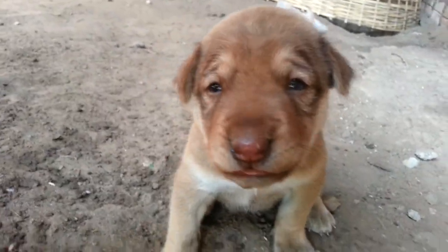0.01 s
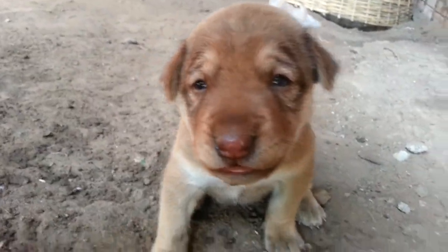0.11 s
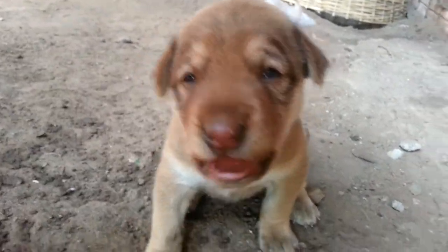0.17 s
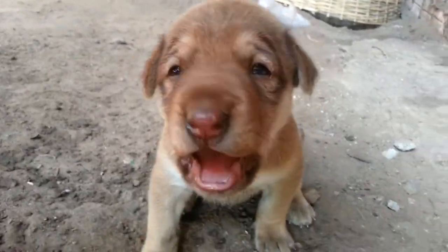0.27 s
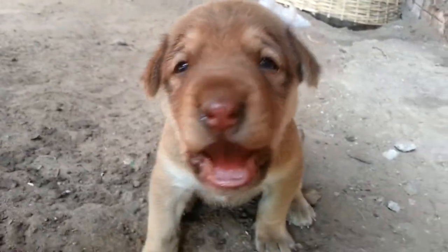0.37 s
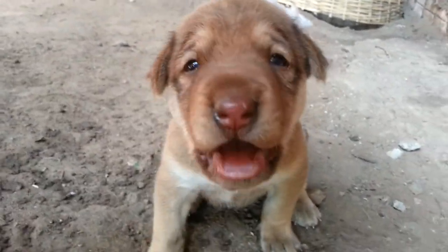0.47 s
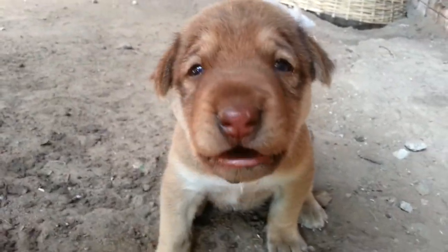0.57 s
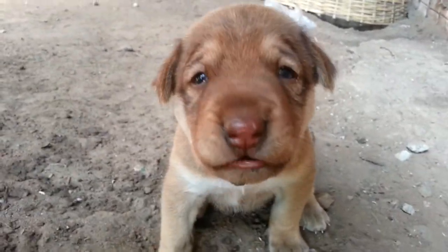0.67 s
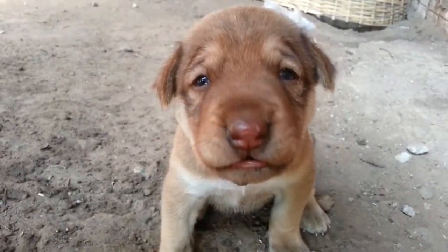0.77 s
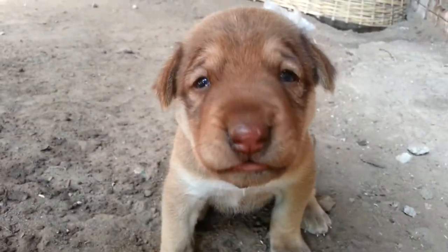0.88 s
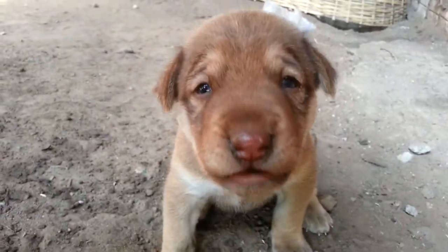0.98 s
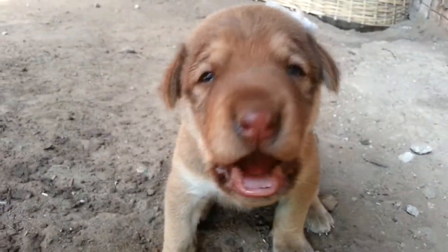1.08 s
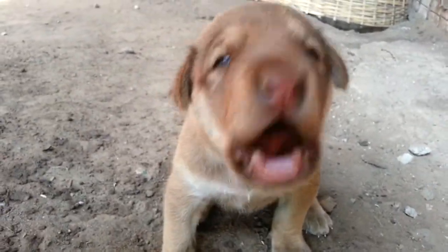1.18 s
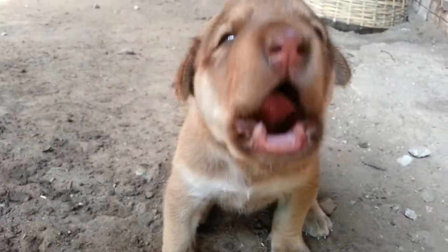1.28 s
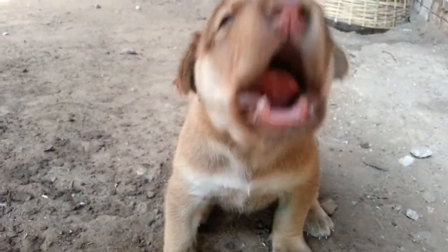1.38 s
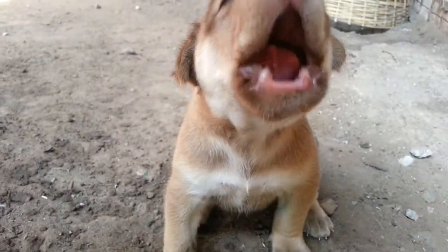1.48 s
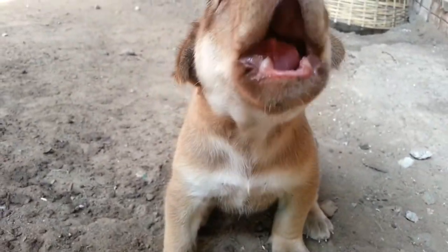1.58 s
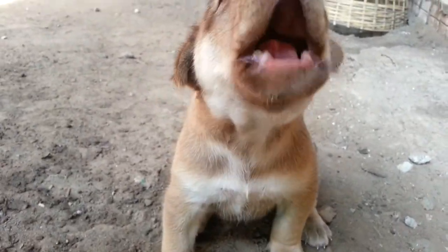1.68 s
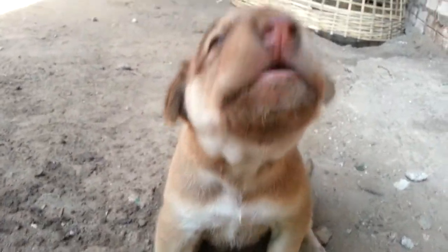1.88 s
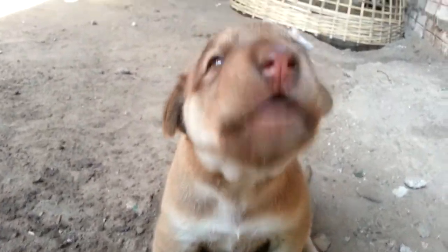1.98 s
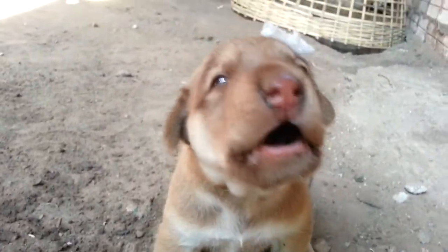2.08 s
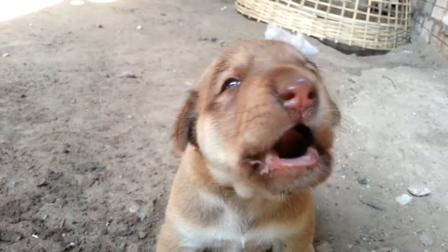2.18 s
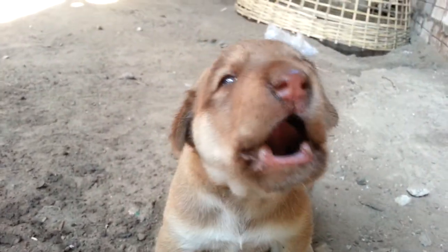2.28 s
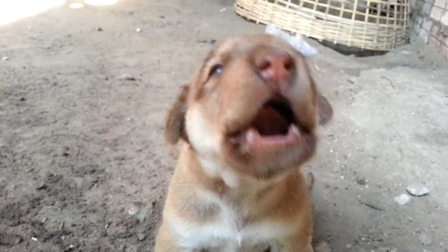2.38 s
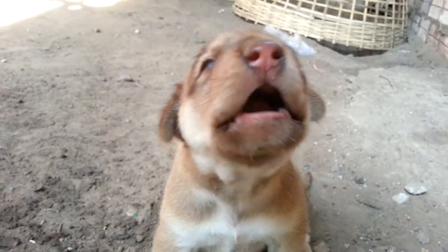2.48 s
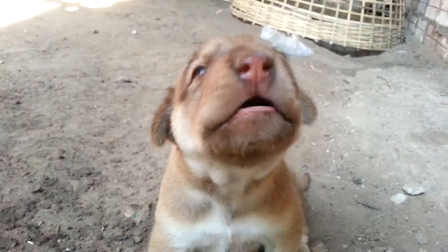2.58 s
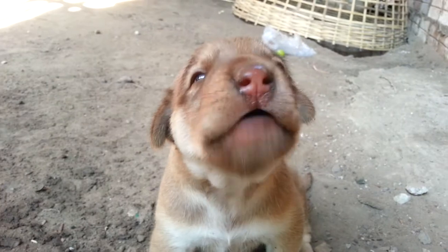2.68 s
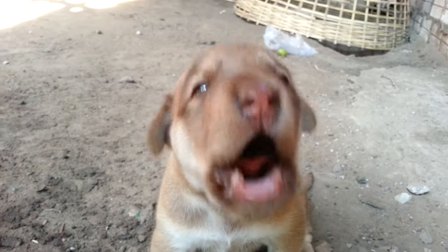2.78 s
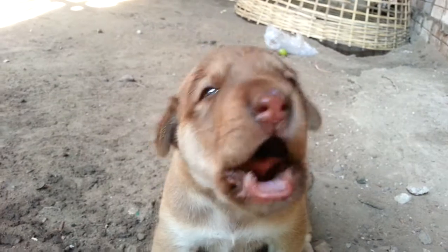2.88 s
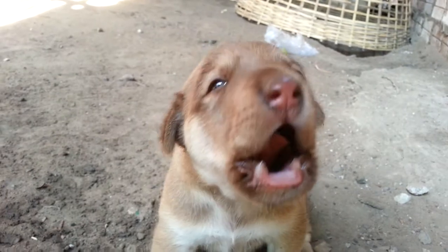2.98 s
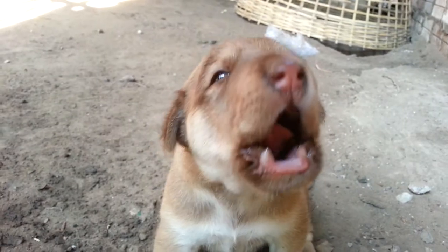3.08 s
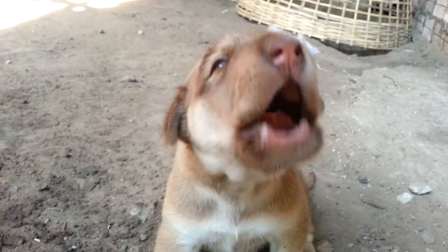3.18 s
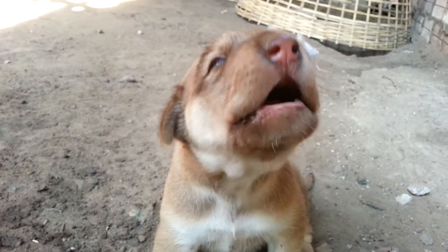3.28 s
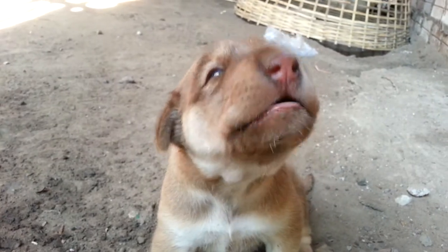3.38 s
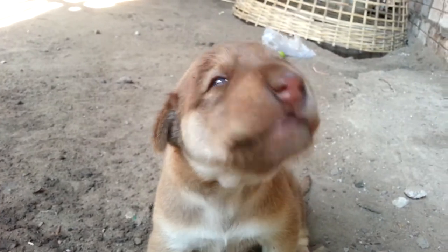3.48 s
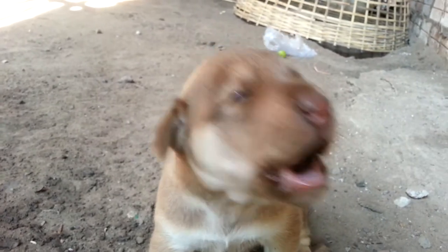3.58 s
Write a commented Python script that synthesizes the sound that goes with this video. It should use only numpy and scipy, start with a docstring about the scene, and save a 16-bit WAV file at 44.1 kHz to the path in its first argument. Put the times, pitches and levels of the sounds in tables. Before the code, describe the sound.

A puppy's earlier cry ends at once. At 0.2-0.6 s a sharp yelp leaps up, cracks and falls hoarsely. From 1.1 to 1.85 s a longer cry starts raspy, dips, then holds a high clear whine. A lower, smoother whine runs 2.05-2.6 s. At 2.8-3.35 s another yelp jumps up, sags and wavers. A new cry begins at 3.58 s. Close, slightly overloaded, faint yard echoes and hiss.

```python
"""A young puppy yelps four times at close range in a dirt yard; an earlier cry is just ending, a new one starting.
Each cry is a source-filter voice: pulses of the vocal folds, even or ragged, ring moving mouth and throat
resonances and a fixed treble. Hoarse stretches come from uneven pulses, clean whines from even ones.
Sparse blurred echoes return from the yard, and a faint outdoor hiss of shaped noise fills the gaps.
Gain control, lopsided overload of the microphones and a band limit act on the sum."""
import sys
import numpy as np
from scipy import signal
from scipy.fft import rfft, irfft, next_fast_len
from scipy.io import wavfile
from scipy.ndimage import uniform_filter1d

SR = 44100
rng = np.random.default_rng(int(sys.argv[2]) if len(sys.argv) > 2 else 0)


def unload_audio(sound):
    """Save the sound as a 16-bit wav file, at the path given as the first command line argument."""
    columns = np.transpose(np.atleast_2d(sound))
    # keep every value between -1 and 1, then stretch to whole-number steps
    steps = np.round(np.clip(columns, -1, 1) * 32767)
    wavfile.write(sys.argv[1], SR, steps.astype(np.int16))


N = 158760

DUCK_DB = 13  # the cries are raised by this much, and the gain control takes away at most this much
EDGE_HZ = 15500  # upper band limit
SIDE = np.array([[.5], [-.5]])  # shares a left-right difference equally between the two channels


def amp(db):
    """Decibel definition: amplitude ratio of a level in dB."""
    return 10 ** (np.asarray(db) / 20)


def evened(x):
    """Normalization to unit RMS."""
    return x / np.sqrt(np.mean(x ** 2) + 1e-20)


def steady(x):
    """Envelope normalization: holds the running level at 1."""
    power = uniform_filter1d(uniform_filter1d(x ** 2, size=400), size=400)
    return x / np.sqrt(abs(power) + 1e-12)


def read(points, hz):
    """Linear interpolation of a curve along logarithmic frequency."""
    f, value = np.transpose(points)
    return np.interp(np.log(hz + 1), np.log(f + 1), value)


def track(t, points):
    """Linear interpolation in time of every column after the first."""
    times, *columns = np.transpose(points)
    return [np.interp(t, times, column) for column in columns]


def add(mix, s, sound):
    """Superposition: adds a sound to the mix from time s [s]."""
    part = mix[:, round(s * SR):][:, :sound.shape[1]]
    part += sound[:, :part.shape[1]]


def coloured(x, gain):
    """Linear filtering: multiplies the whole spectrum by gain(hz)."""
    size = next_fast_len(x.shape[-1] + 2048)
    return irfft(rfft(x, size) * gain(np.fft.rfftfreq(size, 1 / SR)), size)[..., :x.shape[-1]]


def resonate(x, hz, width):
    """Heterodyne resonator: a one-pole low-pass around a moving centre, with a gain of 1 there."""
    carrier = np.exp(2j * np.pi * np.cumsum(hz) / SR)
    r = np.exp(-np.pi * width / SR)
    return 2 * (carrier * signal.lfilter([1 - r], [1, -r], x / carrier)).real


def resonate_twice(x, hz, width):
    """Cascaded resonance: two equal resonators in series give steeper skirts."""
    return resonate(resonate(x, hz, width), hz, width)


def wobble(t, per_s, count):
    """Band-limited randomness: rows of slow chance, each gliding between random values."""
    knots = rng.standard_normal((count, 200))
    return np.array([np.interp((t - t[0]) * per_s, np.arange(200), row) for row in knots])


def spread(x, balance, half_lag_s):
    """Interaural level and time difference: the channels differ by balance [dB] and twice half_lag_s."""
    return coloured(x, lambda f: amp(SIDE * read(balance, f)) * np.exp(4j * np.pi * SIDE * f * half_lag_s))


def vocal_folds(t, pitch, luck):
    """Quasi-periodic source: harmonics of the folds and puffs of breath, scaled by an irregular pulse size."""
    # how unevenly the folds beat: (time [s], uneven pulses [0-1], strong-weak pairing [0-1], breath noise [0-1])
    hoarse = [(0, .2, 0, .05), (.225, .2, 0, .1), (.265, .1, 0, .1), (.278, .25, .4, .06),
              (.3, .2, .45, .08), (.325, .12, .2, .08), (.34, .05, 0, .06), (.48, .04, 0, .06),
              (.488, .5, .5, .3), (.512, .5, .4, .3), (.52, .15, .2, .1), (.53, .55, .6, .25),
              (.585, .65, .7, .3), (.59, .15, .2, .1), (.6, .12, 0, .08), (1.08, .15, 0, .1),
              (1.108, .1, 0, .1), (1.114, .38, .5, .07), (1.132, .32, .45, .08), (1.14, .12, .3, .14),
              (1.165, .08, .3, .1), (1.182, .05, .05, .06), (1.2, .04, 0, .06), (1.31, .04, 0, .06),
              (1.35, .02, .03, .015), (1.4, .005, 0, .006), (1.805, .005, 0, .006), (1.815, .08, 0, .05),
              (2.06, .2, 0, .1), (2.08, .02, 0, .02), (2.55, .01, 0, .015), (2.565, .1, 0, .05),
              (2.775, .15, 0, .1), (2.8, .1, 0, .1), (2.815, .3, .5, .08), (2.862, .22, .35, .1),
              (2.875, .05, .05, .08), (2.92, .03, 0, .04), (3.318, .015, 0, .03), (3.328, .1, 0, .06),
              (3.6, .15, 0, .1)]
    uneven, paired, breath = track(t, hoarse)
    jitter, flutter = 0.14, 0.0019  # timing of uneven pulses [cycles], pitch deviation [fraction]
    shimmer_db, drift_db, fold_tilt = 7.5, 2, 0.58  # fast and slow harmonic wander [dB], roll-off exponent

    shimmer = wobble(t, 36.7, count=37)
    drift = wobble(t, 12, count=37)
    contour, = track(t, pitch)
    hz = uniform_filter1d(contour, size=90) * (1 + flutter * shimmer[0])
    turns = np.cumsum(hz) / SR
    turns = turns + jitter * uneven * np.interp(turns, np.arange(SR), luck[:, 0])

    folds = 0
    for k in range(1, 36):
        fast_db = shimmer_db * min(k / 6, 1) * shimmer[k]
        slow_db = drift_db * min(max(k - 2, 0) / 2, 1) * drift[k]
        below_edge = np.clip((EDGE_HZ - k * hz) / 500, 0, 1)
        folds = folds + k ** -fold_tilt * amp(fast_db + slow_db) * np.cos(2 * np.pi * k * turns) * below_edge

    beat = np.round(turns).astype(int)
    size = np.exp(1.1 * uneven * luck[beat, 1]) * (1 + paired * np.cos(np.pi * turns))
    # a slower, irregular cycle swells roughly every second to tenth pulse
    slip_steps = np.clip(.3 + .2 * luck[:, 3], .1, .5)
    slips = np.interp(turns, np.arange(SR), np.cumsum(slip_steps))
    size = size * (1 + paired * uneven * np.cos(2 * np.pi * slips))

    # breath noise peaks at the start of each cycle
    puffs = (0.1 + np.exp(-(turns % 1) / 0.13)) * luck[:len(t), 2]
    thin_hz = 800
    drive = coloured(-size * (steady(folds) + breath * puffs), lambda f: (1j * f / (thin_hz + 1j * f)) ** 2)
    return drive, size * puffs, uneven


def mouth_and_throat(t, drive, uneven, mouth_hz, throat_hz, throat_db, noise):
    """Formant resonance: the drive rings mouth and throat; ragged pulses widen the mouth band, air hisses past."""
    # hiss of air: (time [s], level re mouth resonance [dB])
    air = [(.2, -30), (.6, -18), (1.1, -56), (1.35, -30.5), (1.55, -30), (1.8, -13.5), (2.1, -17.5),
           (2.6, -56), (2.8, -41), (3.3, -46)]
    mouth_width, rasp_width, throat_width = 158, 1300, 743  # Hz, per resonator
    dark_hz, air_width = 2300, 400

    dark = coloured(drive, lambda f: 1 / (1 + 1j * f / dark_hz) ** 3)
    rasp = np.clip(uneven, 0, 1)
    clean_mouth = steady(resonate(dark, mouth_hz, mouth_width))
    raspy_mouth = steady(resonate_twice(dark, mouth_hz, rasp_width))
    mouth = steady((1 - rasp) * clean_mouth + rasp * raspy_mouth)
    throat = steady(resonate_twice(drive, throat_hz, throat_width))

    air_hz = np.full(len(t), 1913.0)
    air_hiss = evened(resonate_twice(noise, air_hz, air_width))
    air_db, = track(t, air)
    return mouth + amp(throat_db) * throat + amp(air_db) * air_hiss


def fixed_treble(t, drive, breath_puffs, treble_db, top_db):
    """Parallel band-pass filtering: three treble bands of one fixed spectrum follow separate level curves."""
    # fixed treble spectrum: (frequency [Hz], relative level [dB])
    spectrum = [(3000, -1), (3700, 11), (4400, 15), (5200, -3), (6000, -14), (7000, -6.5), (8000, -14.5),
                (9200, -26), (10500, -17), (11700, -8.5), (12800, -15), (14000, -35.5), (14700, -39.5),
                (15400, -63.5)]
    # level of the 5-8 kHz band: (time [s], level re lowest treble band [dB])
    middle_level = [(.25, -11.5), (.35, -18), (.55, -8.5), (1.12, -4.5), (1.22, -9), (1.35, -6),
                    (1.5, -5.5), (1.75, -12.5), (2.12, -7), (2.22, -13), (2.35, -5.5), (2.5, 1.5),
                    (2.82, -6), (2.89, -10), (2.95, -4), (3.1, -4.5), (3.18, -10.5), (3.28, 5)]
    drive = drive + .14 * breath_puffs

    def above(f, edge):
        return np.clip((f - edge) / 800, 0, 1)

    def band(shape):
        return steady(coloured(drive, lambda f: amp(read(spectrum, f)) * shape(f)))

    low = band(lambda f: np.clip((f - 3200) / 600, 0, 1) * (1 - above(f, 5040)))
    middle = band(lambda f: above(f, 5200) * (1 - above(f, 8200)))
    top = band(lambda f: above(f, 8200))
    middle_db, = track(t, middle_level)
    return amp(treble_db) * (low + amp(middle_db) * middle) + amp(top_db) * top


def cry(rows, pitch):
    """Source-filter principle: fold pulses ring the mouth, the throat and the treble, heard in stereo."""
    # left-right balance of the treble: (frequency [Hz], left minus right [dB])
    treble_balance = [(3500, -5), (4500, 1.5), (8000, 13.5), (13000, 5)]
    # left-right balance of mouth and throat: (frequency [Hz], left minus right [dB])
    voice_balance = [(500, 2), (1000, -5), (2500, -6)]
    # the head turns: (time [s], left minus right of mouth and throat [dB])
    pan = [(0.0, 3), (0.27, -4), (0.38, -2), (0.7, 1.5), (1.14, -4), (1.22, -2), (1.69, -0.5), (2.66, -0.5),
           (2.82, -1), (3.04, -3.5), (3.14, 2.5), (3.22, -2.5), (3.25, 1), (3.6, 1.5)]

    rows = np.array(rows, float)
    t = np.arange(rows[0, 0], rows[-1, 0], 1 / SR)
    level_db, mouth_hz, throat_db, throat_hz, treble_db, top_db = track(t, rows)
    luck = rng.standard_normal((SR, 4))

    drive, breath_puffs, uneven = vocal_folds(t, pitch, luck)
    voiced = mouth_and_throat(t, drive, uneven, mouth_hz, throat_hz, throat_db, luck[:len(t), 3])
    treble = fixed_treble(t, drive, breath_puffs, treble_db, top_db)
    treble = spread(treble, treble_balance, -0.00003)
    voiced = spread(voiced, voice_balance, -0.000032)
    pan_db, = track(t, pan)

    # 3 ms fades, except where a cry is cut by the start or the end of the scene
    since_start = t - t[0] + (t[0] == 0)
    until_end = t[-1] - t + (t[-1] > 3.59)
    edge = np.clip(np.minimum(since_start, until_end) / .003, 0, 1)
    return rows[0, 0], edge * amp(level_db + DUCK_DB) * (amp(SIDE * pan_db) * voiced + treble)


def yard(x):
    """Reverberation: sparse random taps, each band dying exponentially; random modulation blurs the pitch."""
    # decay of the echoes: (frequency [Hz], time to fall by 60 dB [s])
    decay = [(400, 0.64), (1500, 0.21), (3000, 0.52), (8000, 0.25)]
    # colour of the echoes: (frequency [Hz], relative level [dB])
    colour = [(500, -4.5), (1100, -7.5), (1700, 4), (2500, -11), (4000, -0.5)]
    echo_db, blur_per_s = -16.5, 150

    knots = rng.standard_normal(2000)
    x = x * np.interp(np.arange(N) * blur_per_s / SR, np.arange(2000), knots)

    # one tap of random sign in every 20 samples
    taps = np.zeros((2, SR // 2))
    at = np.arange(400, SR // 2 - 20, 20) + rng.integers(0, 20, (2, (SR // 2 - 401) // 20))
    np.put_along_axis(taps, at, rng.choice([-1., 1.], at.shape), 1)

    hz, t, z = signal.stft(taps, SR, nperseg=256)
    fall_db = read(colour, hz)[:, None] - 60 * t / read(decay, hz)[:, None]
    tail = signal.istft(z * amp(fall_db), SR, nperseg=256)[1]
    return amp(echo_db) * signal.fftconvolve(x, tail / np.sqrt(SR / 400), axes=1)[:, :N]


def hiss():
    """Spectrally shaped, partly correlated stereo noise: patchy, with a few narrow bands standing out."""
    # spectrum of the hiss: (frequency [Hz], relative level [dB])
    spectrum = [(18, -59.5), (45, -27), (212, -7.5), (503, -14.5), (619, -18), (847, -15), (991, -19.5),
                (1500, -10), (1810, -18), (1950, -8.5), (2810, -24.5), (3290, -17), (3650, -21),
                (5260, -26.5), (6320, -32.5), (13800, -30), (15400, -40)]
    # narrow bands: (centre [Hz], width [Hz], added amplitude re surrounding hiss [dB])
    peaks = [(1485, 30, 3), (1905, 50, 4), (2050, 90, 3), (2590, 40, 0), (3350, 90, 0)]
    # likeness of the channels: (frequency [Hz], left-right correlation [-1 to 1])
    likeness = [(60, 0.7), (240, 0.95), (950, -0.091), (3750, 0.15), (14900, 0.038)]
    # balance of the hiss: (frequency [Hz], left minus right [dB])
    balance = [(60, -0.5), (240, 2), (950, -5.5), (3750, 4.5), (14900, 0)]
    hiss_db, patchy_db = -43, 1.6  # overall RMS level, spread of the patches

    frames, hz = N // 256 + 5, np.fft.rfftfreq(1024, 1 / SR)
    a, b, c, d, patches = rng.standard_normal((frames, 513, 5)).T
    patches = uniform_filter1d(patches, size=12, axis=0)
    patches = evened(uniform_filter1d(patches, size=14, axis=1))

    same = np.clip(read(likeness, hz), -1, 1)[:, None]
    left = a + 1j * b
    right = same * left + np.sqrt(1 - same ** 2) * (c + 1j * d)
    bands = 1 + sum(amp(db) / (1 + (2 * (hz - f) / width) ** 2) for f, width, db in peaks)
    shape_db = (read(spectrum, hz) + SIDE * read(balance, hz))[..., None] + patchy_db * patches
    z = np.array([left, right]) * amp(shape_db) * bands[:, None]
    return amp(hiss_db) * evened(signal.istft(z, nperseg=1024, noverlap=768)[1][:, :N])


def scene():
    """Superposition: the puppy, its echoes and the background hiss."""
    # state of the voice in each cry: (time [s], relative level [dB], mouth resonance [Hz],
    # throat resonance re mouth [dB], throat resonance [Hz], treble re mouth [dB], top treble re mouth [dB])
    cry_ending = [(0.0, -12.5, 1610, -9.5, 2450, -24, -29), (0.014, -13, 1610, -32, 2430, -14, -36),
                  (0.035, -42, 1720, -25, 2270, -26, -30)]
    yelp_1 = [(0.225, -22.5, 1430, -32, 3070, -15, -35), (0.241, -1.5, 1583, -8.5, 3114, -22, -38),
              (0.255, -7.5, 1435, -3, 3090, -12, -21), (0.267, 9.5, 1599, -9, 3060, -18, -46),
              (0.279, -8.5, 1630, 8, 3370, -14, -25), (0.307, -7.5, 1600, -2, 2940, 2, -20),
              (0.321, -18.5, 1310, 8.5, 2570, 12, -23), (0.353, -16.5, 1840, 3.5, 2500, 0.5, -27),
              (0.363, -8.5, 1834, -48, 2320, -12, -32), (0.389, -12.5, 1890, -60, 2450, -14, -36),
              (0.417, -12.5, 1770, -10, 2630, -14.5, -35), (0.439, -11, 1700, -15.5, 2440, -20, -45),
              (0.469, -14, 1740, -2.5, 2240, -14, -38), (0.49, -14, 1640, -7, 2360, -13, -44),
              (0.508, -12.5, 1680, -4, 2500, -14.5, -47), (0.522, -19, 1500, -8, 2300, -12, -40),
              (0.534, -16, 1600, -4.5, 2300, -17, -42), (0.585, -17.5, 1480, -3.5, 2050, -18.5, -41),
              (0.593, -12, 1620, -3.5, 2320, -20.5, -34), (0.62, -54, 1640, -69, 2360, -19, -35)]
    yelp_2 = [(1.079, -16, 1360, -23, 3000, -15, -23), (1.087, -8.5, 1443, -3.5, 3000, -21, -49),
              (1.107, 3, 1602, -11, 2900, -12.5, -38), (1.115, -1.5, 1590, 4, 3010, -15.5, -37),
              (1.157, -7.5, 1480, 3, 2600, -2.5, -22), (1.178, -15.5, 1400, 7.5, 2430, 1, -17),
              (1.19, -20, 1480, 5, 2350, 3, -15), (1.199, -12.5, 1950, 3, 2850, -20, -33),
              (1.211, -10.5, 2050, -9, 3050, -8.5, -28), (1.225, -8, 1780, -7.5, 2850, -26, -40),
              (1.261, -11.5, 1716, -10, 2330, -28, -37), (1.278, -6.5, 1610, -13.5, 2470, -28, -42),
              (1.284, -10.5, 1940, -11, 2400, -19, -28), (1.305, -6.5, 2010, -24, 2870, -25.5, -44),
              (1.317, -15.5, 1690, -1.5, 2520, -10, -20), (1.331, -4.5, 1420, -26, 2780, -19.5, -37),
              (1.359, -6, 1292, -25, 2575, -18, -37), (1.383, -6.5, 1321, -18, 2456, -18.5, -39),
              (1.421, -11.5, 1230, -6, 2520, -14, -25.5), (1.479, -10.5, 1176, -1.5, 2410, -15.5, -31),
              (1.529, -12, 1120, -0.5, 2303, -15, -16), (1.629, -10.5, 1177, -2, 2300, -18.5, -22),
              (1.707, -14, 1228, 1.5, 2490, -17, -10), (1.747, -13, 1214, -3, 2500, -13.5, -18),
              (1.775, -16.5, 1211, 1.5, 2287, -10, -11.5), (1.797, -20, 1133, 0.5, 2290, -10, -24),
              (1.81, -32, 1143, -5, 2290, -15, -25), (1.816, -15.5, 1090, -3.5, 2090, -13.5, -25),
              (1.829, -24.5, 1070, 8, 1852, -22, -34), (1.845, -90, 1534, -19, 2310, -30, -20)]
    yelp_3 = [(2.058, -55, 1180, -36, 2410, -43, -60), (2.066, -26.5, 1020, -16.5, 2430, -24.5, -44),
              (2.092, -6.5, 1310, -7, 2400, -14, -47), (2.112, -4.5, 1540, -5.5, 3030, -15.5, -34),
              (2.142, -6.5, 1730, -4.5, 3110, -19.5, -50), (2.168, -14, 1550, -13, 2930, -14, -29),
              (2.188, -11.5, 1466, -14, 2940, -13, -34), (2.228, -11.5, 1360, -10.5, 2890, -18.5, -41),
              (2.254, -9.5, 1380, -13.5, 2750, -17.5, -39), (2.272, -10, 1440, -14, 2910, -24.5, -49),
              (2.316, -10.5, 1637, -26, 2600, -24.5, -45), (2.36, -9.5, 1576, -30, 2300, -26.5, -38),
              (2.414, -10.5, 1585, -46, 2160, -24, -47), (2.48, -8, 1477, -36, 2530, -37, -34.5),
              (2.534, -11, 1490, -40, 2780, -32, -42), (2.566, -13.5, 1370, -19, 2460, -33, -38),
              (2.585, -75, 1452, -33, 2630, -22, -27.5)]
    yelp_4 = [(2.775, -24, 1095, -48, 2640, -30, -39), (2.789, -5.5, 1106, -15, 2610, -22, -45),
              (2.815, -2, 1234, 1.5, 2566, -5.5, -18.5), (2.859, -4.5, 1990, -2, 2265, -6.5, -22),
              (2.879, 1.5, 2120, -12, 2550, -30.5, -38), (2.899, -5, 1820, -17, 2770, -18, -38),
              (2.937, -13, 1440, -8, 2450, -32.5, -40), (2.953, -13.5, 1785, -11, 2380, -21, -34),
              (2.971, -9, 2030, -23, 2500, -33, -47), (3.003, -12, 1783, -14, 2280, -22.5, -41),
              (3.062, -8.5, 1890, -18, 1390, -33, -44), (3.081, -11.5, 1410, -6, 1980, -20, -42.5),
              (3.111, -7, 1405, -44, 2250, -32.5, -52), (3.139, -8, 1550, -30, 2290, -26, -43.5),
              (3.165, -5.5, 1590, -26, 2270, -28.5, -41), (3.197, -7.5, 1660, -21, 2440, -23, -37.5),
              (3.223, -11, 1514, -29, 2370, -41, -55.5), (3.239, -12, 1510, -23.5, 2470, -29, -42),
              (3.271, -6.5, 1507, -25, 2150, -44, -43), (3.305, -13, 1313, -42, 2360, -50, -37.5),
              (3.331, -13.5, 1690, -44, 2474, -32.5, -39), (3.345, -45.5, 1670, -11, 2510, -39, -43)]
    cry_starting = [(3.575, -42, 980, -27, 2200, -25, -29), (3.583, -42, 920, -13, 2180, -41, -53),
                    (3.6, -6.5, 830, -7, 1970, -35, -40)]
    # repetition rate of the folds in each cry: (time [s], pitch [Hz])
    pitch_ending = [(0, 469), (0.016, 440), (0.037, 474)]
    pitch_1 = [(0.225, 411), (0.238, 496), (0.26, 725), (0.279, 995), (0.283, 1101), (0.302, 1228),
               (0.317, 1214), (0.33, 1067), (0.35, 1094), (0.355, 1056), (0.37, 867), (0.375, 903),
               (0.389, 1008), (0.4, 977), (0.406, 838), (0.417, 823), (0.434, 906), (0.462, 787),
               (0.49, 841), (0.494, 880), (0.514, 726), (0.519, 725), (0.536, 838), (0.547, 755),
               (0.559, 788), (0.583, 720), (0.598, 643), (0.62, 620)]
    pitch_2 = [(1.079, 443), (1.081, 443), (1.089, 540), (1.099, 650), (1.115, 937), (1.121, 1052),
               (1.127, 1151), (1.135, 1221), (1.141, 1241), (1.155, 1248), (1.181, 1233), (1.193, 1055),
               (1.216, 1066), (1.229, 830), (1.238, 842), (1.252, 943), (1.263, 825), (1.272, 800),
               (1.28, 863), (1.286, 984), (1.3, 1003), (1.313, 1043), (1.319, 1308), (1.33, 1326),
               (1.34, 1307), (1.37, 1314), (1.382, 1293), (1.394, 1261), (1.4, 1249), (1.406, 1250),
               (1.412, 1243), (1.424, 1237), (1.442, 1256), (1.46, 1246), (1.472, 1221), (1.496, 1192),
               (1.514, 1153), (1.52, 1139), (1.526, 1140), (1.562, 1144), (1.58, 1135), (1.604, 1147),
               (1.628, 1162), (1.658, 1146), (1.676, 1158), (1.7, 1148), (1.748, 1172), (1.79, 1137),
               (1.796, 1140), (1.809, 1168), (1.814, 1080), (1.83, 961), (1.845, 1034)]
    pitch_3 = [(2.058, 398), (2.064, 397), (2.082, 519), (2.09, 553), (2.11, 592.7), (2.14, 609.5),
               (2.154, 595), (2.188, 518), (2.21, 469), (2.228, 478.3), (2.246, 460.4), (2.262, 479),
               (2.27, 498), (2.278, 498), (2.29, 491), (2.298, 502), (2.314, 520), (2.318, 514),
               (2.33, 498.5), (2.334, 497), (2.342, 500), (2.35, 527), (2.358, 538), (2.366, 534),
               (2.378, 516), (2.398, 548.6), (2.41, 543.4), (2.422, 523.5), (2.426, 522), (2.45, 532),
               (2.454, 530), (2.462, 515), (2.478, 513), (2.49, 523.6), (2.498, 532), (2.51, 517.8),
               (2.534, 525.4), (2.554, 542.5), (2.564, 496), (2.585, 488)]
    pitch_4 = [(2.774, 357), (2.788, 483), (2.803, 654), (2.814, 845), (2.819, 951), (2.83, 1035),
               (2.833, 1117), (2.84, 1099), (2.853, 1057), (2.862, 1055), (2.903, 930), (2.913, 780),
               (2.92, 763), (2.929, 730), (2.937, 718), (2.952, 713), (2.965, 648.5), (2.991, 639),
               (3.011, 583), (3.062, 625), (3.074, 672), (3.119, 713), (3.129, 771), (3.2, 829),
               (3.253, 801), (3.274, 747), (3.302, 720), (3.315, 693), (3.329, 630), (3.343, 656)]
    pitch_starting = [(3.575, 427.7), (3.6, 526)]

    puppy = np.zeros((2, N))
    for rows, pitch in ((cry_ending, pitch_ending), (yelp_1, pitch_1), (yelp_2, pitch_2),
                        (yelp_3, pitch_3), (yelp_4, pitch_4), (cry_starting, pitch_starting)):
        add(puppy, *cry(rows, pitch))
    return puppy + yard(puppy) + hiss()


def record(dry):
    """Compression and saturation: gain control, lopsided overload of the peaks, then the band limit."""
    duck_from_db = -15.5  # gain reduction grows over the next 10 dB
    ceiling, skew, knee = 1.0, 0.02, 8  # full scale, asymmetry [fraction], sharpness of the bend

    power_db = 10 * np.log10(abs(uniform_filter1d((dry ** 2).mean(0), size=600)) + 1e-12)
    x = dry * amp(-DUCK_DB * np.clip((power_db - duck_from_db) / 10, 0, 1))

    limit = ceiling * (1 - skew * np.sign(x))
    x = x / (1 + abs(x / limit) ** knee) ** (1 / knee)
    low_pass = signal.firwin(511, EDGE_HZ, window=("kaiser", 9), fs=SR)
    return signal.oaconvolve(x, low_pass[None], "same")


dry = scene()
out = record(dry)
unload_audio(out)
```